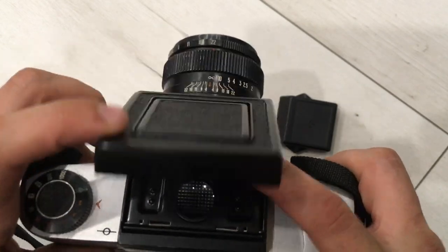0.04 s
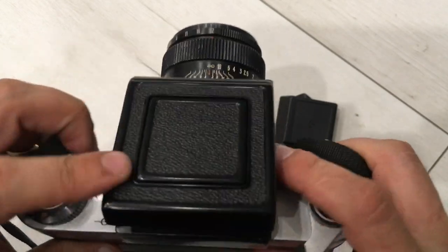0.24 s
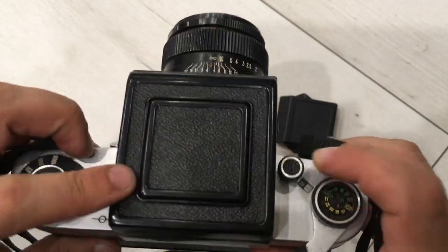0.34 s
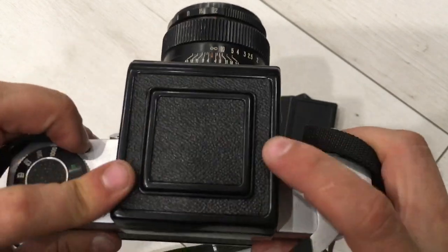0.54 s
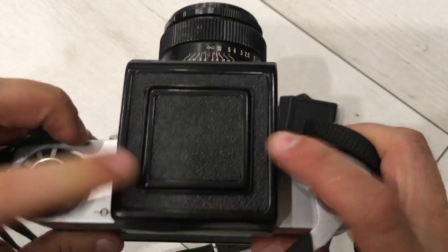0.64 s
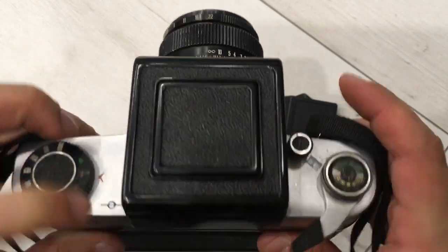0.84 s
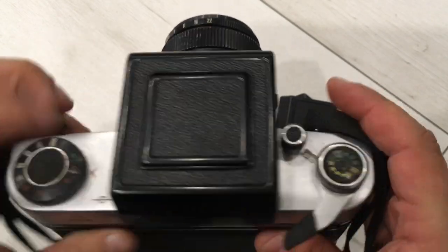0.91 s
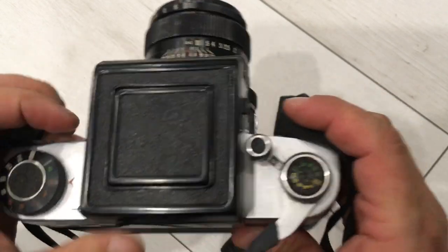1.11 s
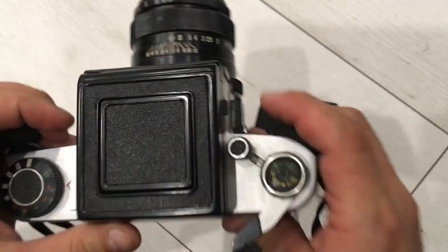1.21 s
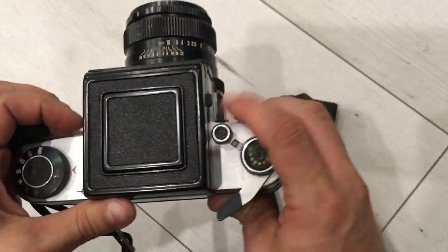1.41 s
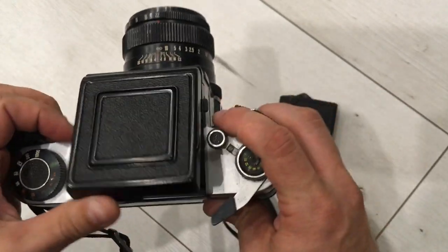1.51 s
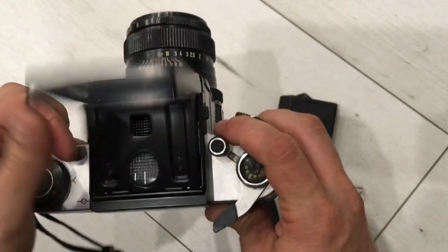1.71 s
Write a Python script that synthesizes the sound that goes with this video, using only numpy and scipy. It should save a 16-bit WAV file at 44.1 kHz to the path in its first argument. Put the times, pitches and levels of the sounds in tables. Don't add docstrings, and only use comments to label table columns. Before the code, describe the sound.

A camera's thin metal viewfinder hood ticks, rubs and slams shut with a sharp bright clack, ringing into a hard-floored room; then quiet fingertip ticks and a few small snaps, close microphone, faint electrical hum.

```python
import sys
import numpy as np
from scipy import signal
from scipy.fft import rfft, irfft, next_fast_len
from scipy.io import wavfile

SR = 44100
rng = np.random.default_rng(int(sys.argv[2]) if len(sys.argv) > 2 else 0)


def dump(signal):
    limited = np.clip(np.atleast_2d(signal).T, -1, 1)
    pcm = np.round(limited * 32767).astype(np.int16)
    wavfile.write(sys.argv[1], SR, pcm)


def attenuation_scalar(level_db):
    decades = np.asarray(level_db, float) / 20
    return 10 ** decades


N = 77175

# (time [s], level [dB], chatter length [s], main ring [Hz], rest of the hood [dB])
SLAM = [
    (.3706, -12, 0.0077, 2490, 2.5),
    (.391, -31.5, 0.013, 2500, 1.5),
    (.401, -40, .002, 2900, 6.5),
]
SLAM_TIME_S = SLAM[0][0]
# (time [s], level [dB], length [s])
GRIP = (1.347, -50, 0.026)
AIR_TOP_HZ = 15600


def rms(x):
    return np.sqrt(np.mean(x ** 2))


def rms_one(x):
    return x / np.sqrt(np.mean(x ** 2) + 1e-20)


def at_hz(points, hz):
    table_hz, value = np.array(points).T[:2]
    return np.interp(np.log(hz), np.log(table_hz), value)


def add_at(out, time_s, sound):
    out[int(time_s * SR):][:len(sound)] += sound


def resonate(x, hz, width_hz):
    r = np.exp(-np.pi * width_hz / SR)
    b = np.array([1, 0, -1]) * (1 - r * r) / 2
    return signal.lfilter(b, [1, -2 * r * np.cos(2 * np.pi * hz / SR), r * r], x)


def resonate_twice(x, hz, width_hz):
    return resonate(resonate(x, hz, width_hz), hz, width_hz)


def coloured(x, spectrum):
    size = next_fast_len(len(x) + 2048)
    hz = np.maximum(np.fft.rfftfreq(size, 1 / SR), 1)
    log_gain = at_hz(spectrum, hz) * np.log(10) / 20
    cepstrum = irfft(log_gain, size)
    cepstrum[1:size // 2] *= 2
    cepstrum[size // 2 + 1:] = 0
    return irfft(rfft(x, size) * np.exp(rfft(cepstrum)), size)[:len(x)]


def top_cut(x, hz):
    return signal.sosfilt(signal.cheby2(12, 50, hz, fs=SR, output="sos"), x)


def chatter(n):
    contacts_per_s, size_spread_db = 9000, 4.5
    sizes = attenuation_scalar(size_spread_db * np.minimum(rng.exponential(1, n), 4)) * rng.choice([-1, 1], n)
    return sizes * (rng.random(n) < contacts_per_s / SR)


def swell(length_s):
    t = np.arange(SR // 10) / SR
    return np.sin(np.pi * np.clip(t / length_s, 0, 1)) ** 2


def mode_sum(x, modes):
    total = 0
    for k, (hz, width_hz, db) in enumerate(modes):
        total = total + (-1) ** k * attenuation_scalar(db) * resonate(x, hz, width_hz) / np.sqrt(width_hz)
    return rms_one(total)


def rings(x, modes, spread_db):
    q_max = 12
    struck = [(hz, max(width_hz, hz / q_max), db + spread_db * rng.standard_normal())
              for hz, width_hz, db in modes]
    return mode_sum(x, struck)


ATTACK_S = .0002


def contact(envelope, level_db, hz, rest_db, first_db=-60):
    # (frequency [Hz], width [Hz], level [dB])
    hood_modes = [(963, 30, -11.5), (1125, 42, -6), (2076, 63, 1), (2440, 400, 7.5), (2557, 600, 3.5),
                  (3380, 250, -7.5), (3400, 96, 3), (5020, 200, -9), (4430, 272, -20.5), (5760, 400, -9),
                  (8500, 3000, 2), (10500, 606, 2.5), (11540, 2500, 3.5), (14400, 670, 3)]
    # (frequency [Hz], level [dB])
    skin_colour = [(300, -34.5), (1100, -19), (1600, 1), (2500, 1), (5700, 6), (12600, -5.5),
                   (16000, -16.5), (16800, -8)]
    modes_db, mode_spread_db, ring_q = 3, 2.5, 7.9
    grains = chatter(len(envelope))
    grains[int(ATTACK_S * SR)] = attenuation_scalar(first_db + 3.5)
    grains = envelope * grains + 1e-18
    skin = rms_one(coloured(grains, skin_colour))
    rest = skin + attenuation_scalar(modes_db) * rings(grains, hood_modes, mode_spread_db)
    panel = rms_one(resonate(grains, hz, hz / ring_q))
    sound = panel + attenuation_scalar(rest_db) * rms_one(rest)
    return attenuation_scalar(level_db) * rms_one(sound) * rms(envelope)


def snap_events(rows):
    first_hit_db, sag_db, settle_db = 5, 4.5, -10
    release_s, settle_s = .0011, .009
    out, t = np.zeros(N + SR), np.arange(SR // 10) / SR
    for time_s, db, length_s, hz, rest_db in rows:
        after = np.maximum(t - length_s, 0)
        bite = np.minimum(0.34 + t / ATTACK_S, 1)
        held = attenuation_scalar(-sag_db * np.minimum(t / length_s, 1)) * np.exp(-after / release_s)
        settling = attenuation_scalar(settle_db) * np.exp(-after / settle_s)
        add_at(out, time_s, contact((held + settling) * bite, db, hz, rest_db, first_hit_db))
    return out[:N]


def slam():
    # (frequency [Hz], level [dB])
    blow_colour = [(300, -0.5), (520, -21.5), (800, 1), (1150, 5), (1600, -10.5), (2500, 5.5), (5500, 4),
                   (14000, 1.5)]
    # (frequency [Hz], level [dB])
    pulse_colour = [(500, -27), (974, -16.5), (1380, -19.5), (2360, -2), (3300, 1), (4600, -4.5),
                    (8000, -2.5), (15500, -4)]
    room_pulse_db = 16
    plain = snap_events(SLAM)
    blow = rms_one(coloured(plain, blow_colour)) * rms(plain)
    pulse = np.zeros(N)
    pulse[int(SLAM_TIME_S * SR)] = 1
    pulse = coloured(pulse, pulse_colour)
    return blow, attenuation_scalar(room_pulse_db) * pulse / np.sqrt(np.sum(pulse ** 2))


def lid():
    # (frequency [Hz], level [dB], T60 [s])
    clusters = [(747, -42.5, 0.24), (1013, -32, 0.19), (1133, -43, 0.54), (2020, -44.5, 0.47),
                (2338, -42, 0.94), (2480, -41, 0.78), (2530, -40.5, 0.29), (3100, -45, 0.81)]
    width_hz = 70
    t, out = np.arange(N) / SR - SLAM_TIME_S, np.zeros(N)
    for hz, db, t60_s in clusters:
        cluster = rms_one(resonate(rng.standard_normal(N), hz, width_hz))
        out += attenuation_scalar(db - 2 - 60 * np.abs(t) / t60_s) * cluster
    return (t > 0) * out


def panels():
    # (frequency [Hz], width [Hz], level [dB], T60 [s])
    panel_bands = [(3440, 400, -47, .5), (4570, 250, -45, 0.58), (6300, 700, -45, 0.71),
                   (8640, 600, -42, 0.55), (9870, 500, -42, .35), (13500, 900, -43, .25)]
    t, out = np.arange(N) / SR - SLAM_TIME_S, np.zeros(N)
    for hz, width_hz, db, t60_s in panel_bands:
        band = rms_one(resonate_twice(rng.standard_normal(N), hz, width_hz))
        out += attenuation_scalar(db - 60 * np.abs(t) / t60_s) * band
    return (t > 0) * out


def strikes():
    # (time [s], peak level [dB], frequency [Hz], T60 [s])
    impacts = [(.1919, -19, 8800, .010), (.1920, -22, 3500, .012), (.1938, -26, 3000, .014),
               (.2024, -35, 3100, .012), (.2042, -10, 2650, .008), (.2061, -15, 2720, .009),
               (.2043, -24, 1900, .012), (.2043, -20, 6300, .006), (.2045, -23, 8500, .009),
               (.2122, -37, 9000, .03), (.3688, -30, 9000, .005), (.3692, -28, 5500, .005),
               (.3696, -27, 12500, .004), (.3712, -24, 1155, .065), (.3708, -15, 2640, .025),
               (.3722, -17, 2990, .015), (.3710, -20, 4620, .025), (.3714, -21, 5160, .02),
               (.3745, -22, 6920, .02), (.3730, -22, 9630, .015), (.9690, -40, 11800, .004),
               (.9771, -40, 11800, .004), (.9813, -21, 11800, .007), (.9814, -29, 15400, .006),
               (.9815, -33, 7000, .012), (.9816, -34, 8900, .012), (.9932, -40, 7000, .012),
               (1.4150, -48, 5700, .008), (1.4222, -48, 5800, .008), (1.4300, -50, 6000, .01),
               (1.049, -52, 1000, .04), (1.3352, -48, 3200, .008), (1.3358, -52, 2300, .02),
               (1.7142, -47, 5200, .007), (1.7143, -50, 8500, .006), (1.7182, -46, 2700, .012),
               (1.7200, -47, 9500, .006), (1.7203, -45, 3100, .015), (1.7364, -29, 3050, .009),
               (1.7364, -31, 7400, .009), (1.7384, -34, 9400, .006), (1.7372, -40, 1250, .025),
               (1.7384, -36, 4000, .01)]
    rise_s, low_cut_hz = .0002, 800
    out, t = np.zeros(N + SR), np.arange(SR // 5) / SR
    onset = 1 - np.exp(-t / rise_s)
    for time_s, db, hz, t60_s in impacts:
        add_at(out, time_s, attenuation_scalar(db - 60 * t / t60_s) * onset * np.sin(2 * np.pi * hz * t))
    return signal.sosfilt(signal.butter(2, low_cut_hz, "high", fs=SR, output="sos"), out[:N])


def snaps():
    # (time [s], level [dB], chatter length [s], main ring [Hz], rest of the hood [dB])
    snap_rows = [(.1627, -47, 0.0071, 875, 2.5), (.1918, -29.5, 0.0023, 10600, 12.5),
                 (.2040, -26.5, .003, 4960, 9), (.2190, -38.5, .007, 6270, 9),
                 (.2100, -44.5, 0.0091, 9000, 3), (0.579, -49.5, 0.01, 2500, -31),
                 (.9840, -44, 0.0023, 2980, 4), (.1922, -35, .003, 3340, 0),
                 (.9813, -35.5, 0.00091, 13200, -1), (.9930, -39, 0.0017, 3100, 7),
                 (1.048, -61, 0.011, 962, -14), (1.188, -59.5, 0.0041, 3400, -21),
                 (1.336, -59, 0.0062, 2400, -1), (1.522, -41.5, 0.0011, 7730, 8),
                 (1.53, -55, 0.0033, 7820, -27.5), (1.568, -60.5, 0.0036, 2230, -8.5),
                 (1.7362, -40.5, 0.0035, 4440, 0.5), (1.738, -44.5, 0.0058, 1300, 6)]
    return snap_events(snap_rows)


def rubs():
    # (time [s], level [dB], length [s], main ring [Hz], rest of the hood [dB])
    rub_rows = [(0.226, -44.5, 0.035, 2700, -7), (0.316, -42.5, 0.019, 3000, -5.5),
                (0.3456, -29, 0.014, 3240, 9), (0.355, -33.5, 0.0098, 3100, 0),
                (0.94, -57, 0.031, 12000, -5), (1.406, -56.5, 0.012, 6000, -1),
                (1.462, -52.5, 0.014, 4800, -4), (1.422, -58, 0.018, 7500, -16),
                (1.461, -45.5, 0.019, 11400, -10), (1.519, -52.5, 0.019, 1150, -3.5),
                (1.718, -45.5, 0.011, 2900, -1)]
    out = np.zeros(N + SR)
    for time_s, db, length_s, hz, rest_db in rub_rows:
        add_at(out, time_s, contact(swell(length_s), db, hz, rest_db))
    return out[:N]


def ticks():
    # (time [s], peak level [dB], ring [Hz])
    tick_rows = [(.683, -48, 9000), (0.782, -47.5, 11000), (0.97, -35, 11900), (0.976, -38, 12000),
                 (1.049, -47, 10240), (1.025, -48, 2795), (1.07, -50, 8000), (1.077, -52, 1900),
                 (1.14, -58.5, 12040), (1.21, -61, 9940), (1.286, -48.5, 12600), (1.388, -49.5, 9050),
                 (1.415, -48.5, 9000), (1.422, -40.5, 9000), (1.434, -52, 9000), (1.444, -55, 10100),
                 (1.4893, -43, 11200), (1.509, -61, 10900), (1.586, -62.5, 11000), (1.612, -46.5, 12100)]
    decay_s, q = .0004, 1.8
    out, t = np.zeros(N + SR), np.arange(SR // 100) / SR
    for time_s, db, hz in tick_rows:
        puff = resonate_twice(rng.standard_normal(len(t)) * np.exp(-t / decay_s), hz, hz / q)
        add_at(out, time_s, attenuation_scalar(db) * puff / np.abs(puff).max())
    return top_cut(out[:N], AIR_TOP_HZ)


def grip():
    # (frequency [Hz], width [Hz], level [dB])
    body_modes = [(590, 60, 0), (1000, 200, -3), (1580, 300, -2), (2400, 600, -1), (4200, 600, -10)]
    time_s, db, length_s = GRIP
    out, press = np.zeros(N + SR), swell(length_s)
    rung = rings(press * chatter(len(press)), body_modes, 0)
    add_at(out, time_s, attenuation_scalar(db) * rms(press) * rung)
    return out[:N]


def slips():
    # (frequency [Hz], width [Hz], level [dB])
    slip_modes = [(600, 95, -4), (1010, 83, -3), (1580, 280, 2.5), (2120, 160, 0), (2500, 220, -0.5),
                  (3970, 180, -15)]
    slips_per_s, jitter, level_db, count = 600, 0.13, -45.5, 40
    time_s, _, length_s = GRIP
    train, out = np.zeros(SR // 10), np.zeros(N)
    when_s = np.cumsum(1 + jitter * rng.standard_normal(count)) / slips_per_s
    train[(when_s * SR).astype(int)] = attenuation_scalar(2.3 * rng.standard_normal(count))
    envelope = np.sqrt(swell(length_s))
    rung = mode_sum(train * envelope + 1e-18, slip_modes)
    add_at(out, time_s, attenuation_scalar(level_db) * rung * rms(envelope))
    return out


def rustle():
    # (time [s], level [dB], length [s], main ring [Hz], rest of the hood [dB])
    skin_rubs = [
        (.99, -61, 0.06, 2500, 1.5),
        (1.365, -61, 0.042, 1500, 6),
        (1.405, -62, .045, 10000, 3),
        (.42, -55, 0.05, 200, -22.5),
    ]
    out = np.zeros(N + SR)
    for time_s, db, length_s, hz, rest_db in skin_rubs:
        add_at(out, time_s, contact(np.sqrt(swell(length_s)), db, hz, rest_db))
    return out[:N]


def knocks():
    # (time [s], peak level [dB], frequency [Hz])
    knock_rows = [
        (0.202, -89, 60),
        (0.37, -28.5, 115),
        (0.98, -46, 340),
        (1.738, -49.5, 402),
    ]
    t60_s = 0.078
    out, t = np.zeros(N + SR), np.arange(SR // 5) / SR
    for time_s, db, hz in knock_rows:
        push = rng.standard_normal(len(t)) * attenuation_scalar(-60 * t / t60_s)
        low = resonate(resonate(push, hz, 0.27 * hz), hz, 5.4 * hz)
        add_at(out, time_s, attenuation_scalar(db) * low / np.abs(low).max())
    return out[:N]


def room(x):
    # (frequency [Hz], T60 [s])
    decay_times = [(300, 0.7), (1000, 1.32), (2500, 1.02), (5000, 0.6251), (9000, 0.68), (11500, 0.35),
                   (15000, 0.35)]
    # (frequency [Hz], level [dB])
    echo_colour = [(300, -13.5), (1000, 1), (2400, -3.5), (5000, -1), (10000, -5), (15000, 1.5)]
    level_db, delay_s, top_hz = -16.5, 0.0027, 16300
    t, edges_hz = np.arange(SR) / SR, 200 * 2 ** np.arange(0, 6.6, .5)
    white, echo = rng.standard_normal((2, SR)), 0
    for k, (low, high) in enumerate(zip(edges_hz, edges_hz[1:])):
        hz = np.sqrt(low * high)
        band_pass = signal.butter(2, [low, high], "band", fs=SR, output="sos")
        band = signal.sosfilt(band_pass, white[k % 2])
        echo = echo + band * attenuation_scalar(at_hz(echo_colour, hz) - 60 * t / at_hz(decay_times, hz))
    echo = echo * (1 - np.exp(-(t / delay_s) ** 2))
    wet = signal.fftconvolve(x, echo / np.sqrt(np.sum(echo ** 2)))[:N]
    return top_cut(attenuation_scalar(level_db) * wet, top_hz)


def lamps():
    # (frequency [Hz], level [dB])
    whine_tones = [(2304, -80.5), (5696, -83), (6950, -85), (7795, -90), (8586, -76.5), (9157, -80),
                   (11386, -81), (14088, -90), (14185, -75), (14286, -81)]
    # (frequency [Hz], width [Hz], level [dB])
    buzz_bands = [(60, 19, -70.5), (320, 87, -75.5), (996, 81, -78), (8900, 160, -76.5), (9070, 300, -75),
                  (13800, 204, -88), (14280, 280, -68), (14800, 150, -77)]
    hum_hz, hum_db, second_db, wobble_db = 100.5, -62.5, -80.5, 2
    whine_flicker, buzz_flicker, buzz_flicker_from_hz = 0.97, 0.4, 12000
    t = np.arange(N) / SR
    turn = 2 * np.pi * hum_hz * t
    wobble = rms_one(resonate(rng.standard_normal(N), 6.8, 14.0))
    hum = attenuation_scalar(hum_db + wobble_db * wobble) * np.sin(turn) + attenuation_scalar(second_db) * np.sin(2 * turn)
    whine, buzz = np.zeros(N), np.zeros(N)
    for hz, db in whine_tones:
        whine += attenuation_scalar(db) * np.sin(2 * np.pi * (hz * t + rng.random()))
    for hz, width_hz, db in buzz_bands:
        band = rms_one(resonate_twice(rng.standard_normal(N), hz, width_hz))
        depth = buzz_flicker * (hz > buzz_flicker_from_hz)
        buzz += attenuation_scalar(db) * band * (1 + depth * np.sin(turn))
    return np.sqrt(2) * (hum + whine * (1 + whine_flicker * np.sin(turn))) + buzz


def air():
    # (frequency [Hz], level [dB])
    air_colour = [(40, -22.5), (100, -18), (250, -19.5), (600, -32), (2300, -31), (6000, -36),
                  (10500, -37.5), (15000, -32)]
    return attenuation_scalar(-62.5) * rms_one(coloured(rng.standard_normal(N), air_colour))


def scene():
    blow, pulse = slam()
    small = snaps() + rubs() + ticks() + grip()
    near = blow + lid() + panels() + strikes() + small + slips() + rustle() + knocks()
    background = top_cut(air() + lamps(), AIR_TOP_HZ)
    return (near + room(small + pulse) + background)[None]


def roll_off(x):
    return signal.sosfilt(signal.butter(12, 16870, fs=SR, output="sos"), x)


def record(dry):
    overload = .95
    x = signal.sosfilt(signal.butter(4, 45, "high", fs=SR, output="sos"), dry)
    x = top_cut(overload * np.tanh(x / overload), 17000)
    return roll_off(x)


dry = scene()
out = record(dry)
dump(out)
```